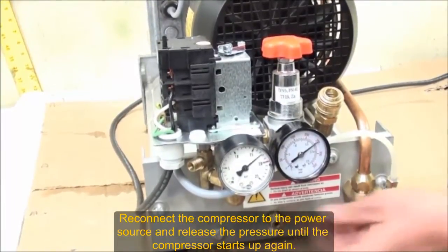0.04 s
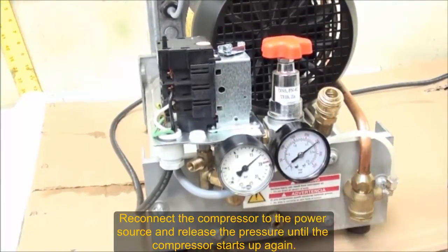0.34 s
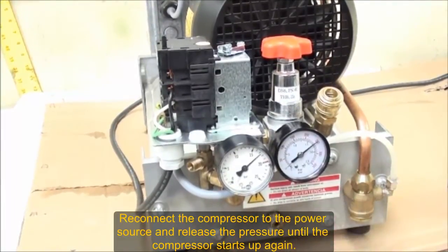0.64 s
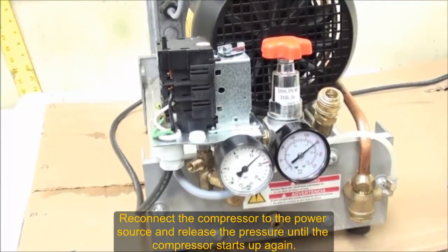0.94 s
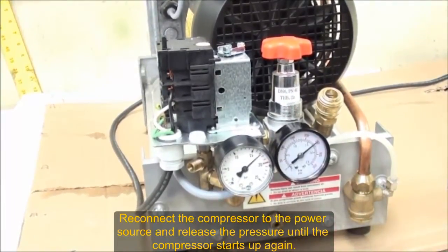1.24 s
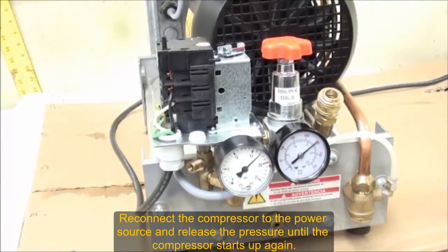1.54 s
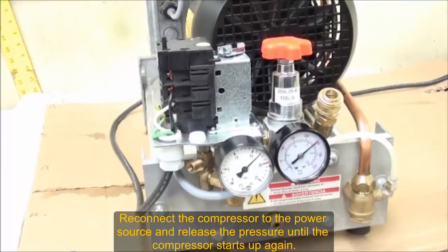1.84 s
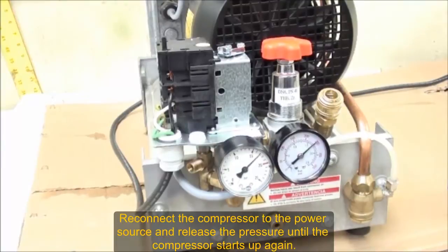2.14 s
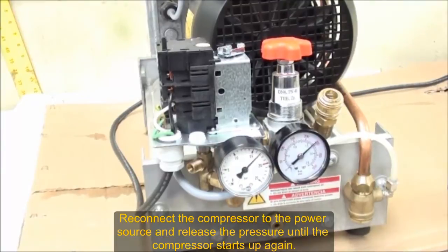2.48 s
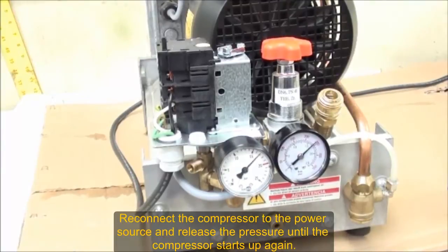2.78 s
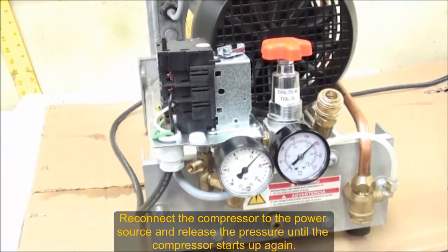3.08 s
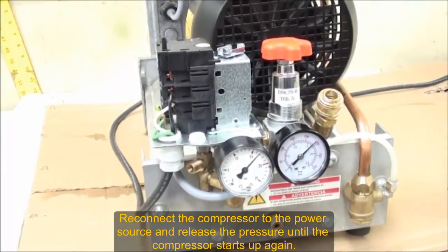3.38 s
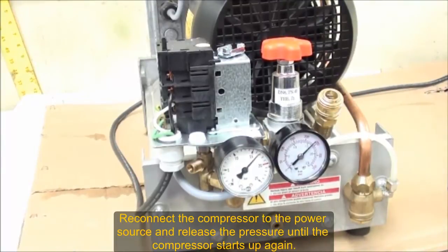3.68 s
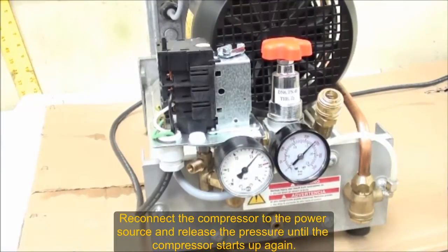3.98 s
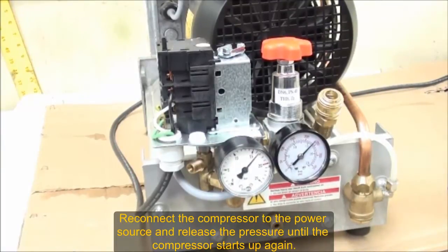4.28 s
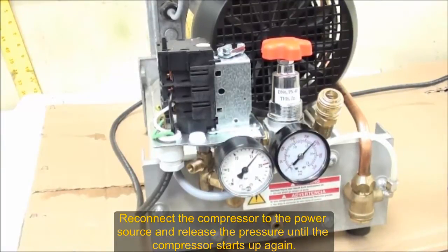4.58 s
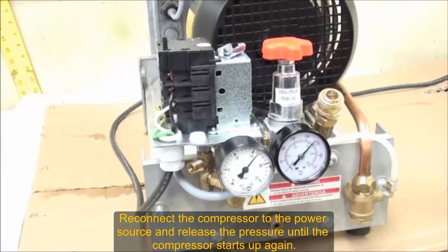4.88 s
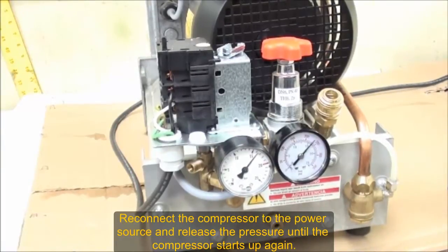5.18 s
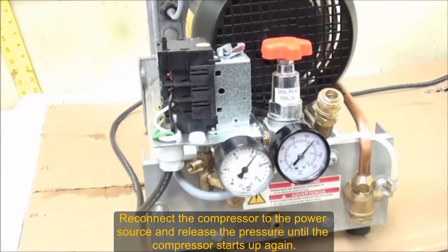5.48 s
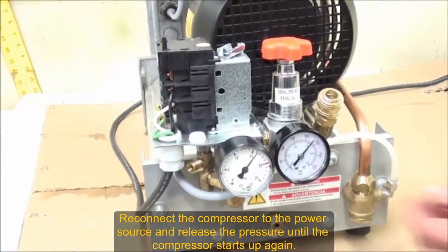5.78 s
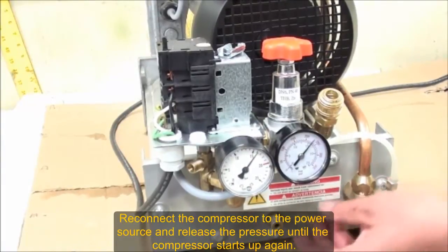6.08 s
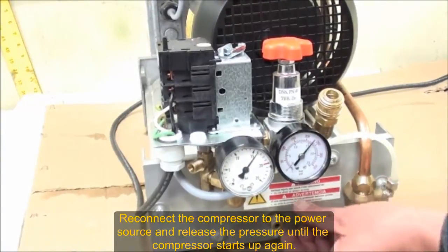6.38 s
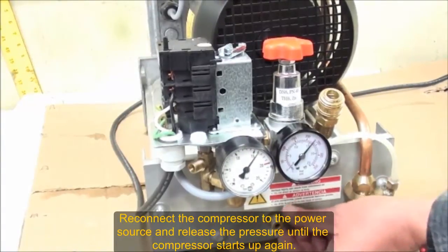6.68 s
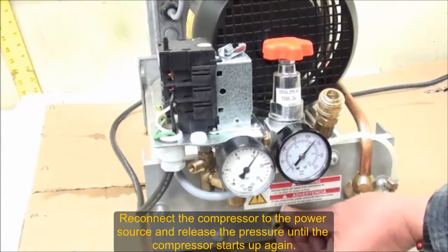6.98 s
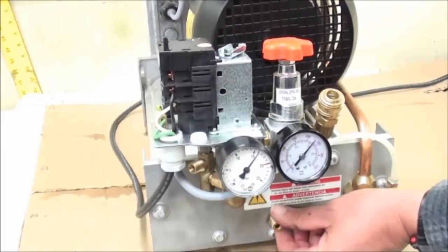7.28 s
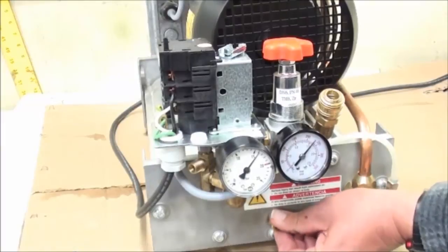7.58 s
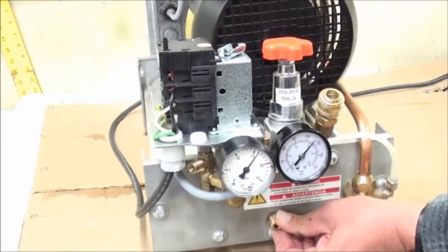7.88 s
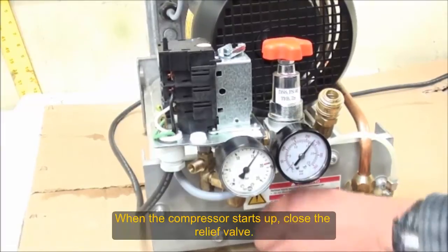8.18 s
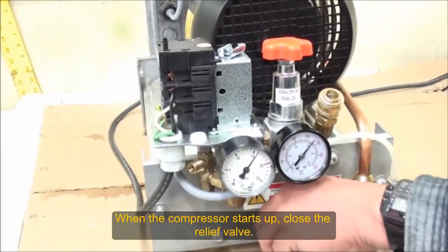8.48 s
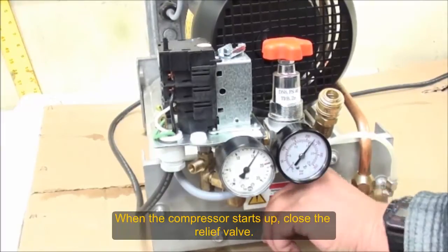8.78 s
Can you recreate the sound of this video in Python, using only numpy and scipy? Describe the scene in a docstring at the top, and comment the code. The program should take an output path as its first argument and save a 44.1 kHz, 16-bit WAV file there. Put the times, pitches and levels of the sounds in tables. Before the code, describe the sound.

A loud, high hiss of compressed air pours from the open relief valve of a small compressor, close by, and runs for the whole nine seconds over a soft low rush. It starts bright, with a quick sweep in tone as a hand moves away, then holds steady. From about 4 to 6 seconds it takes on a slightly fuller, more resonant colour. Between 6 and 8 seconds a returning hand gently shifts the upper hiss. A metal part rings very faintly at a medium pitch in the air stream, swelling around 6.3 seconds and again at 8.3. At about 8.1 seconds the hand cups the valve, and the hiss turns hollower and more focused, with a brief sharp flare at 8.3. Fingers choke the flow in several tiny dips between 8.2 and 9 seconds, and the air is still hissing at the end.

```python
"""Air from a relief valve.

A turbulent jet hisses from the open valve of a small compressor, close by, over a low rush of eddies.
It excites the valve's resonances; the lower ones swell and fade, strongest midway.
A hand leaves and returns, sweeping the hiss by interference, then cups the valve to form a cavity.
Late on, the air stream sets a metal part ringing faintly."""
import sys
import numpy as np
from scipy import signal
from scipy.io import wavfile
from scipy.ndimage import uniform_filter1d

SR = 44100
rng = np.random.default_rng(int(sys.argv[2]) if len(sys.argv) > 2 else 0)


def inscribe(sig):
    """Save sig as 16-bit PCM at rate SR to the path in sys.argv[1].

    A 1-D sig is mono; a 2-D sig holds one channel per row.
    Samples are clipped to [-1, 1] before scaling.
    """
    pcm = np.round(np.clip(np.atleast_2d(sig).T, -1, 1) * 32767)
    wavfile.write(sys.argv[1], SR, pcm.astype(np.int16))


N = 398663
FRAME, HOP = 1024, 256
FRAME_S = np.arange(N // HOP + 5) * HOP / SR
BIN_HZ = np.fft.rfftfreq(FRAME, 1 / SR)
SETTLE_DB = -1.5  # hiss and rush start this much weaker


def gain_of(db):
    """Amplitude ratio of a level in decibels."""
    return 10 ** (np.asarray(db) / 20)


def unit_rms(x):
    """Normalisation to an rms of one."""
    return x / np.sqrt(np.mean(x ** 2) + 1e-20)


def spectrum(points):
    """Spectral envelope, interpolated at every bin on a log-frequency axis."""
    hz, db = np.transpose(points)
    return np.interp(np.log(BIN_HZ + 1), np.log(hz), db)


def follow(rows):
    """Linear interpolation of each column of a time table at every frame."""
    times, *columns = np.transpose(rows)
    return [np.interp(FRAME_S, times, column)[:, None] for column in columns]


def bell(hz, width_hz):
    """Gaussian band of height one, with this width at half height."""
    return np.exp2(-(2 * (BIN_HZ - hz) / width_hz) ** 2)


def pulse(peak_s, length_s, t=FRAME_S[:, None]):
    """Gaussian pulse of height one, with this length at half height."""
    return np.exp2(-(2 * (t - peak_s) / length_s) ** 2)


def ramp(start_s, length_s):
    """Linear rise from zero to one over the frames."""
    return np.clip((FRAME_S[:, None] - start_s) / length_s, 0, 1)


def wander(slow_hz, fast_hz):
    """Random fluctuation by superposition of sines of random phase."""
    rates_hz = np.geomspace(slow_hz, fast_hz, 30)
    cycles = FRAME_S[:, None] * rates_hz + rng.random(len(rates_hz))
    return unit_rms(np.sin(2 * np.pi * cycles).sum(1))[:, None]


def patches(frames, bins):
    """A random field, correlated over time and frequency by moving averages."""
    field = rng.standard_normal((len(FRAME_S), len(BIN_HZ)))
    return unit_rms(uniform_filter1d(uniform_filter1d(field, frames, 0), bins, 1))


def unsettled(decay_s=0.86):
    """Exponential relaxation from one to zero as the jet settles."""
    return np.exp(-FRAME_S[:, None] / decay_s)


def turbulence(shape_db, level_db):
    """Turbulence radiates broadband noise, here nearly mono, with a moving spectrum and a set level."""
    # stereo width: f/Hz, side relative to mid/dB
    width = [(30, -19), (650, -18.5), (1300, -27), (2200, -36), (3100, -31), (4300, -19), (6000, -18),
             (8000, -22), (9600, -31), (15000, -35)]
    shape = gain_of(shape_db)
    shape = shape / np.sqrt(np.mean(shape ** 2, 1, keepdims=True)) * gain_of(level_db)
    white = rng.standard_normal((2, (len(FRAME_S) - 1) * HOP))
    mid, side = signal.stft(white, nperseg=FRAME, noverlap=FRAME - HOP)[2] * shape.T
    side = side * gain_of(spectrum(width))[:, None]
    left_right = np.array([mid + side, mid - side])
    return signal.istft(left_right, nperseg=FRAME, noverlap=FRAME - HOP)[1][:, :N]


def hiss(level_db=-14.5, flutter_db=0.4, patchy_db=0.64):
    """Source and filter: fluttering jet noise is shaped by the valve, then by the hand closed round it."""
    open_db = open_valve() + passing_hand()
    shape_db = (1 - closure()) * open_db + closure() * cupped_hand()
    shape_db = shape_db + flares() + patchy_db * patches(frames=10, bins=30)
    return turbulence(shape_db, level_db + SETTLE_DB * unsettled() + flutter_db * wander(3, 40))


def open_valve():
    """Resonance colours the jet, in dB; the lower resonances swell and fade, strongest midway."""
    # envelope of the free jet: f/Hz, relative level/dB
    jet_envelope = [(1200, -43.5), (2200, -24.5), (2700, -15.5), (4200, -15), (6050, -12.5), (6550, -4.5),
                    (7600, -2), (9300, -3), (10000, -5.5), (11700, -7), (12150, -12), (15600, -14)]
    # peaks and troughs of valve and fittings:
    # f/Hz, width/Hz, gain with the lower resonances weak/dB, strong/dB
    valve_modes = [(2750, 260, 0.5, 2.5), (3110, 64, -2, 5.5), (3570, 100, 3.5, 3.5), (3810, 70, 5, 10.5),
                   (4470, 65, 4.5, 12), (4580, 66, 6, 6.5), (4780, 61, 6.5, 13), (4900, 130, 2.5, -3),
                   (5210, 88, 6.5, 7), (5375, 200, 5, 10), (5740, 170, 1.5, 7), (6270, 100, 1.5, 5.5),
                   (6800, 430, 2, 2.5), (7100, 150, 0.5, -2.5), (7530, 340, 4.5, -0.5), (7870, 90, 6, -7),
                   (8110, 94, -3, -19), (8540, 280, 3.5, -6.5), (8850, 150, 2, 1.5), (8850, 110, -2, 0),
                   (9120, 460, 3, -2.5), (10040, 310, 1, -6), (10600, 600, 2, 0), (11700, 170, -1, -3),
                   (13100, 260, 2, 1.8), (13750, 250, -3, -.5), (14500, 240, 0, 3)]
    # strength of the lower resonances: t/s, share (0-1)
    lower_resonances = [(0, 0.16), (.8, .47), (1.5, 0), (3.3, .15), (4.2, 0.86), (5.6, 0.9), (6.3, 0.48),
                        (7.1, 0.4), (7.6, 0.06)]
    share, = follow(lower_resonances)
    modes_db = sum((weak_db + share * (strong_db - weak_db)) * bell(hz, width_hz)
                   for hz, width_hz, weak_db, strong_db in valve_modes)
    return spectrum(jet_envelope) + modes_db


def rush(level_db=-33, patchy_db=1.22, cupped_bass_db=-1.5, swell_db=1):
    """Larger eddies downstream radiate lower frequencies; the closed hand holds back some of the bass."""
    # envelope of the rush: f/Hz, relative level/dB
    rush_envelope = [(8, 0), (30, -1.5), (90, 0.5), (350, -1), (900, 0), (1700, -1), (2600, -3),
                     (6000, -9.5), (16000, -25)]
    shape_db = spectrum(rush_envelope) + patchy_db * patches(frames=14, bins=4)
    shape_db = shape_db + cupped_bass_db * closure() * bell(150, 560)
    reach = pulse(peak_s=6.05, length_s=1.3)  # the hand reaches into the stream
    return turbulence(shape_db, level_db + SETTLE_DB * unsettled() + swell_db * reach)


def flares():
    """Brief resonance, in dB: one band flares as the fingers shift at the valve."""
    # flaring bands: t/s, length/s, f/Hz, width/Hz, gain/dB
    bands = [(.01, .06, 5150, 800, 7), (8.327, .1, 5650, 900, 10), (8.86, 0.073, 6050, 500, 2)]
    return sum(db * pulse(s, length_s) * bell(hz, width_hz) for s, length_s, hz, width_hz, db in bands)


def passing_hand(notch_width_hz=1100, lift_width_hz=1550, fade_share=0.28):
    """Interference with the open hand's echo cuts two gliding notches and lifts a third band, in dB."""
    # the hand leaves, reaches in, nears, hovers: start t/s, end t/s, depth/dB, main notch start f/Hz,
    # end f/Hz, frequency ratios of second notch and of lifted band to main notch, top treble/dB
    moves = [(.02, .2, 6, 10200, 7400, 0.56, 1.4, 0), (6.08, 6.5, 4, 13900, 14000, 0.9, 0.46, 1),
             (6.58, 7.46, 6, 10400, 11200, 0.754, 0.61, 0.5),
             (7.47, 8.13, 7.5, 10500, 11200, 1.13, 0.854, -.5)]
    shape_db = 0
    treble_db = 2 + 3 * unsettled()  # the hiss starts brighter
    for start, end, depth_db, from_hz, to_hz, second_ratio, lift_ratio, move_treble_db in moves:
        fade_s = fade_share * (end - start)
        near = ramp(start - fade_s / 2, fade_s) - ramp(end - fade_s / 2, fade_s)
        hz = from_hz + (to_hz - from_hz) * ramp(start, end - start)
        main_notch = bell(hz, notch_width_hz)
        second_notch = 0.47 * bell(second_ratio * hz, second_ratio * notch_width_hz)
        lift = 0.55 * bell(lift_ratio * hz, lift_width_hz)
        shape_db = shape_db + near * depth_db * (lift - main_notch - second_notch)
        treble_db = treble_db + near * move_treble_db
    return shape_db + hand_echo(treble_db, delay_s=0.000314, ripple_db=0.17)


def hand_echo(treble_db, delay_s, ripple_db):
    """Comb filtering by a short reflection off the hand, with a lift or cut of the top treble, in dB."""
    comb_db = ripple_db * np.cos(2 * np.pi * BIN_HZ * delay_s)
    return comb_db + treble_db * bell(hz=15000, width_hz=5500)


def metal_ring(modes_hz=(544.1, 658.5), modes_db=(0, -9.5), fall_db_per_s=4.5, waver_db=2.0):
    """Flow-induced vibration: two sharp modes of a metal part swell, waver and slowly decay."""
    # swells of the ringing: peak t/s, level/dB, rise/(dB/s)
    swells = [(6.35, -43.5, 22), (8.3, -45.5, 56)]
    t, ringing = np.arange(N) / SR, np.zeros(N)
    now = FRAME_S[:, None]
    swell_db = np.max([db - np.maximum(rise * (peak_s - now), fall_db_per_s * (now - peak_s))
                       for peak_s, db, rise in swells], axis=0)
    for hz, mode_db in zip(modes_hz, modes_db):
        level_db = swell_db + mode_db + waver_db * wander(0.935, 6.6)
        rms = np.interp(t, FRAME_S, gain_of(level_db)[:, 0])
        ringing += np.sqrt(2) * rms * np.sin(2 * np.pi * (hz * t + rng.random()))
    return ringing


def closure():
    """Degree of enclosure of the valve by the hand, from zero to one."""
    return ramp(start_s=8.07, length_s=0.08)


def cupped_hand(loose_treble_db=5.5, tight_treble_db=-7, full_shade_tightness=0.36):
    """Cavity resonance, in dB: a tighter grip strengthens the hollow's peak and shades the treble."""
    # envelope of the cupped jet: f/Hz, relative level/dB
    cup_envelope = [(1200, -54), (2200, -19), (3000, -16), (4700, -15), (6000, -13), (8500, -11.5),
                    (11000, -11.5), (13000, -11.5), (15600, -13.5)]
    # the closing hand: t/s, tightness (0-1), resonance of the hollow f/Hz, of the finger gap f/Hz
    grip = [(8.18, 0.1, 7570, 11200), (8.29, 0.05, 7440, 13600), (8.38, .45, 7000, 11200),
            (8.52, 0.43, 6860, 11900), (8.64, 0.9, 6570, 10000), (8.83, 0.9, 7130, 10300),
            (8.9, 1, 7000, 10300), (9.02, 1, 6960, 10400)]
    # peaks and troughs between palm and valve: f/Hz, width/Hz, gain when loose/dB, when tight/dB
    palm_modes = [(3050, 800, -2.5, 4), (3950, 970, 7, -3.5), (5900, 530, 1.5, 3.5), (8250, 900, 7.5, 3),
                  (8900, 500, 1, 1), (9600, 400, -1, -4), (11600, 1000, 2, -6)]
    tightness, hollow_hz, gap_hz = follow(grip)
    modes = [(hollow_hz, 1210, 9.3, 14), (gap_hz, 890, 5, 6.8)] + palm_modes
    modes_db = sum((loose_db + tightness * (tight_db - loose_db)) * bell(hz, width_hz)
                   for hz, width_hz, loose_db, tight_db in modes)
    shade = np.minimum(tightness / full_shade_tightness, 1)
    treble_db = loose_treble_db + (tight_treble_db - loose_treble_db) * shade
    fine_db = 2 * patches(frames=30, bins=6)  # fine peaks shift with the fingers
    echo_db = hand_echo(treble_db, delay_s=0.00049, ripple_db=0.6)
    return spectrum(cup_envelope) + modes_db + fine_db + echo_db


def chokes():
    """Throttling of the flow: gains of hiss and rush as fingers briefly block the outlet."""
    # blockages: t/s, hiss gain/dB, rush gain/dB, length/s
    blockages = [(8.213, -1.2, -2, 0.06), (8.335, -3, 0.5, 0.16), (8.664, -6, -3, 0.016),
                 (8.742, -2, -2, 0.041), (8.838, -3.5, 0, .04), (8.933, -3, 0, .018)]
    t = np.arange(N) / SR
    change_db = sum(np.outer(gains_db, pulse(s, length_s, t)) for s, *gains_db, length_s in blockages)
    return gain_of(change_db)


def scene():
    """Superposition of the throttled hiss and rush and the ringing metal."""
    hiss_gain, rush_gain = chokes()
    return hiss_gain * hiss() + rush_gain * rush() + metal_ring()


def record(dry, cutoff_hz=15680):
    """Band limiting by a steep low-pass filter."""
    low_pass = signal.firwin(1023, cutoff_hz, window=("kaiser", 9), fs=SR)
    return signal.oaconvolve(dry, low_pass[None], "same")


dry = scene()
out = record(dry)
inscribe(out)
```